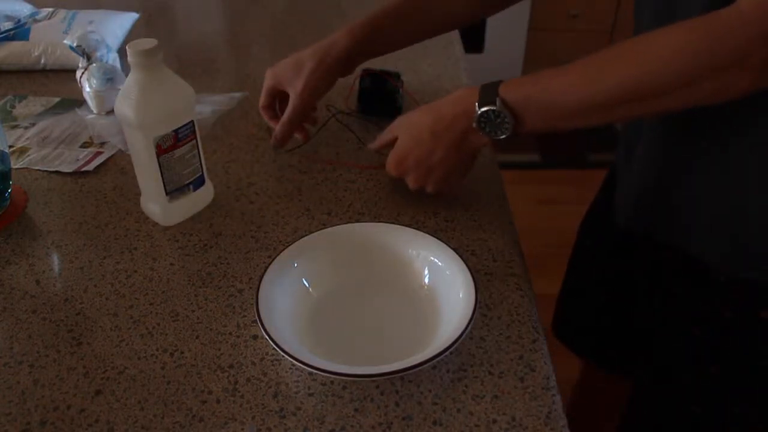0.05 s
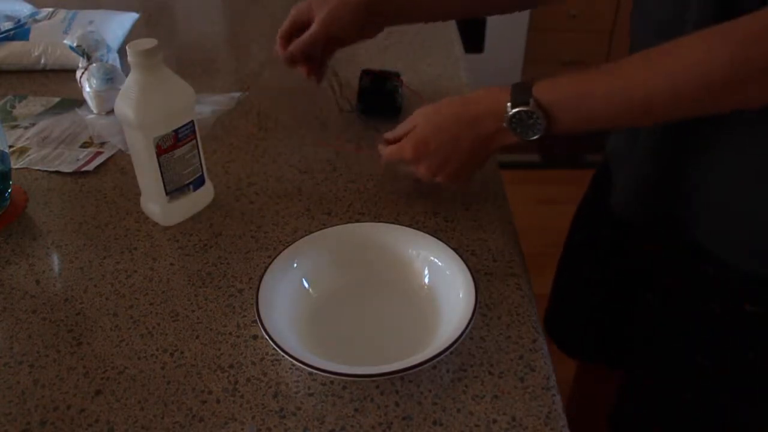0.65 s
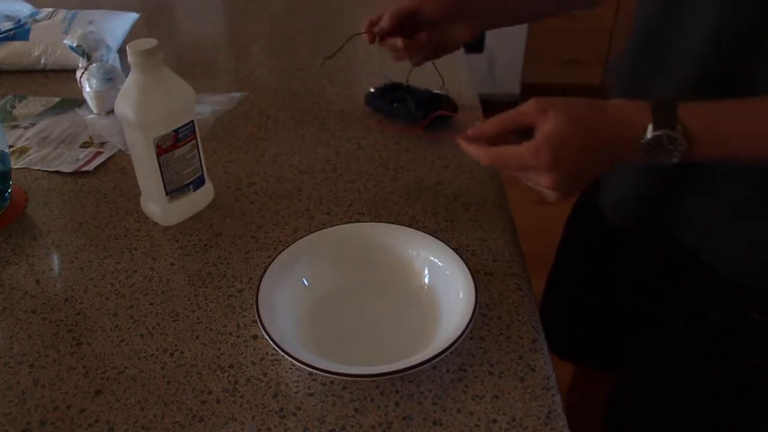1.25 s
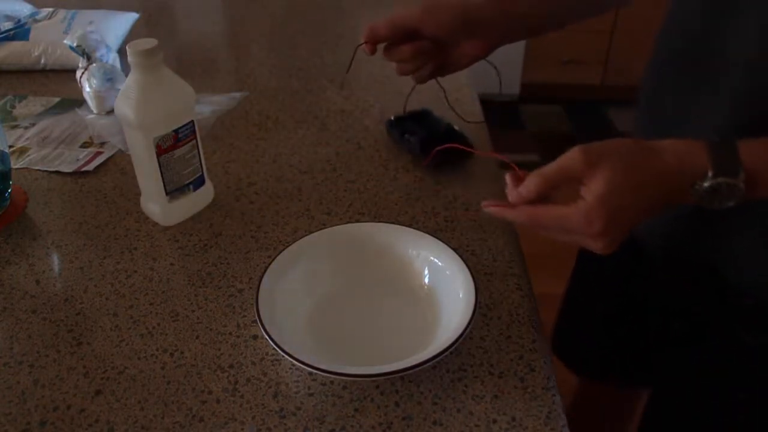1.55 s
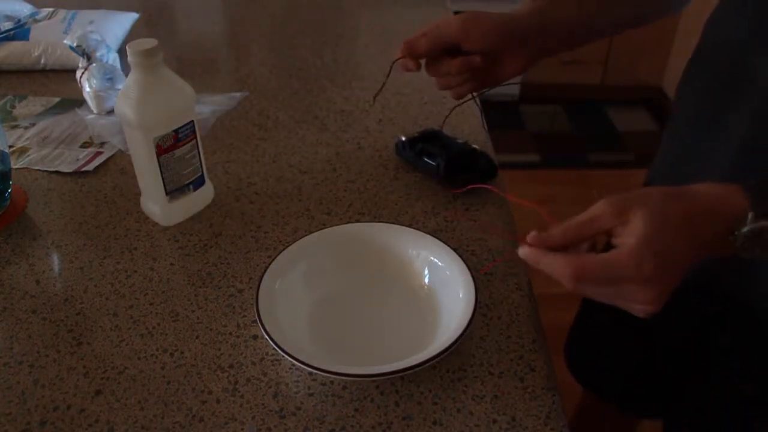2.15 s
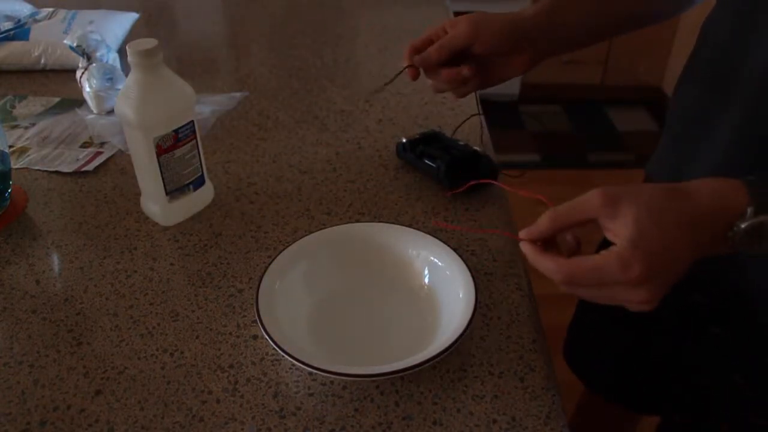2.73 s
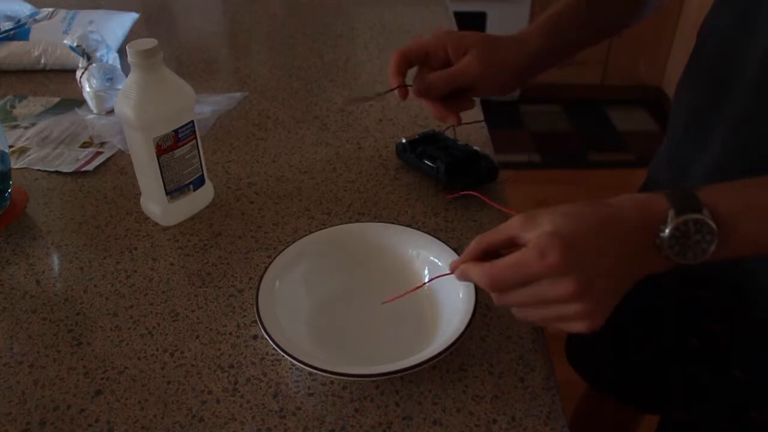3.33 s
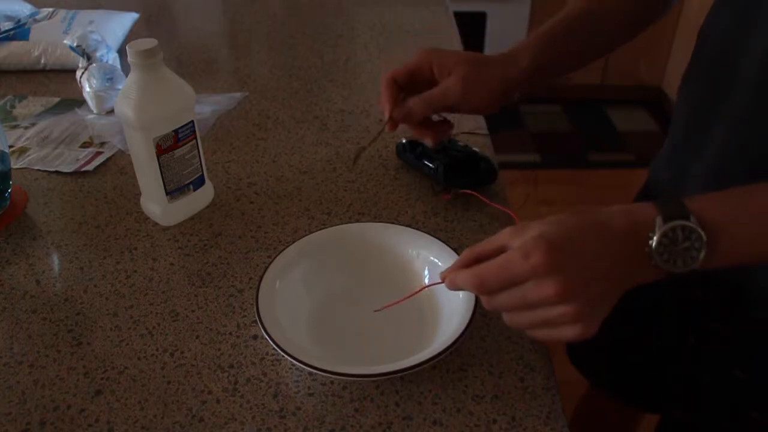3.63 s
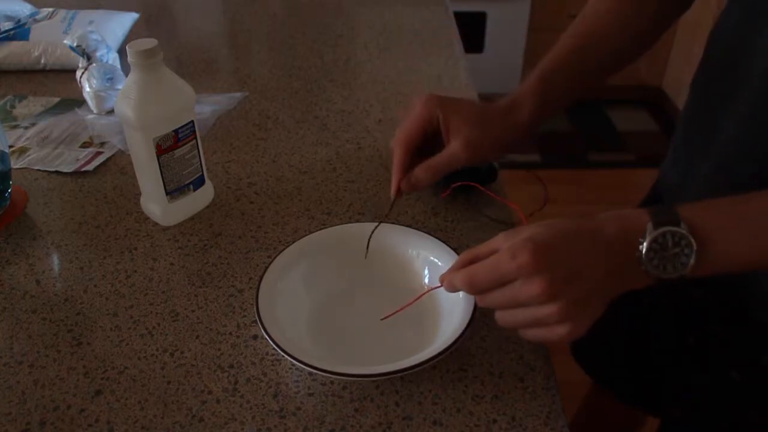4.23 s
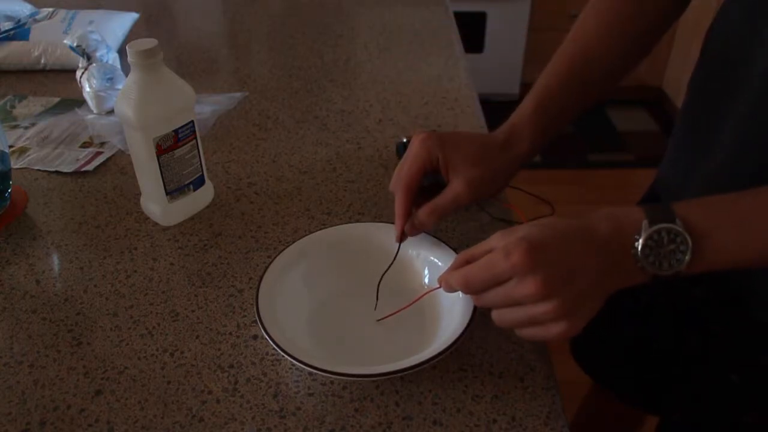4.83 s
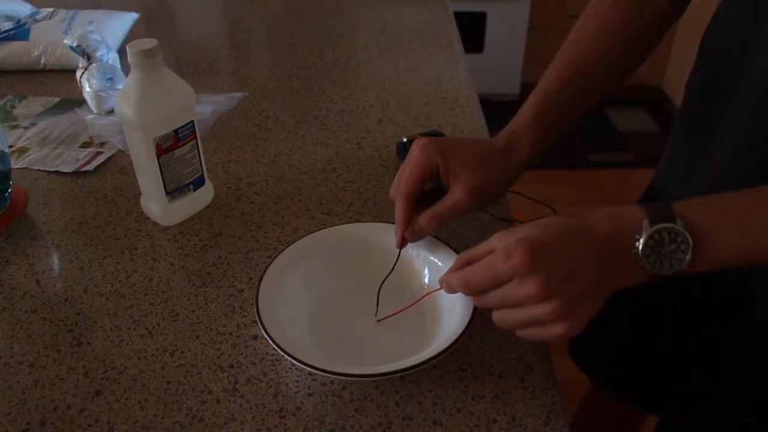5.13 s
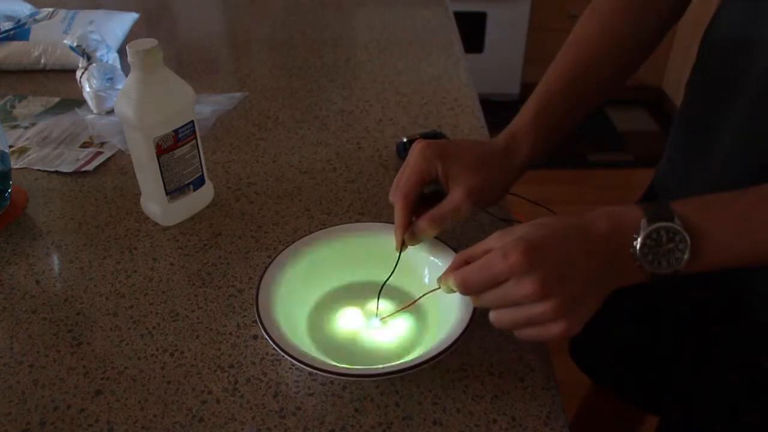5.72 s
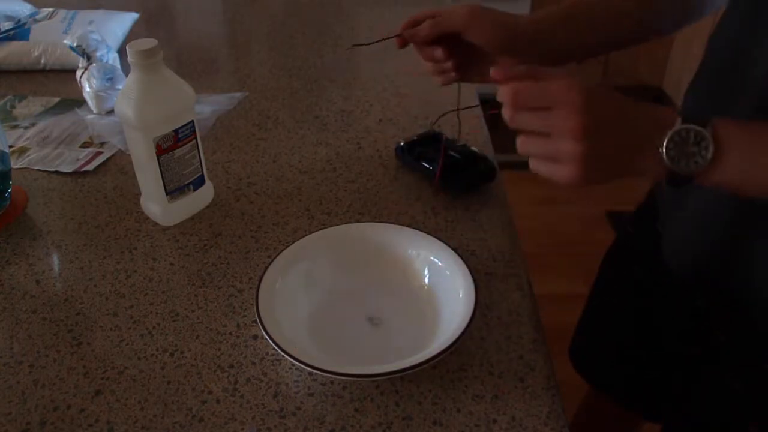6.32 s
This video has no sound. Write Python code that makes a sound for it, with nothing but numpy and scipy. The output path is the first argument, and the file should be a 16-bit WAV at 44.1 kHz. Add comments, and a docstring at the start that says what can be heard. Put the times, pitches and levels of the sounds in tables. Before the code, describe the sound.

In a quiet kitchen with faint air noise and an appliance hum, a small plastic device clicks and is dragged briefly over a stone counter, scraping and juddering. A few more light clicks follow. After a pause, alcohol vapour ignites in a bowl with one very loud, sharp crack that overloads the nearby microphone and rings around the room. Two soft knocks come as it fades.

```python
"""Faint air noise and an appliance hum in a kitchen. A small plastic spark unit clicks, is dragged by
its wires over the stone counter, and clicks again. The wires meet in a bowl of alcohol: one violent
crack, thrown back by counter, cupboards and walls, then two soft knocks of the unit. The crack clips
and ducks the gain, which recovers about as fast as the room dies away, so the tail hangs for a moment."""
import sys
import numpy as np
from scipy import signal
from scipy.fft import rfft, irfft, next_fast_len
from scipy.io import wavfile
from scipy.ndimage import uniform_filter1d

SR = 44100
rng = np.random.default_rng(int(sys.argv[2]) if len(sys.argv) > 2 else 0)


def to_wav(sig):
    """Store sig (one row per channel, or 1-D mono) as 16-bit WAV at the path in sys.argv[1].

    Samples outside -1..1 are clipped; the rate is SR.
    """
    pcm = np.clip(np.atleast_2d(sig), -1, 1) * 32767
    pcm = np.round(pcm).astype(np.int16)
    wavfile.write(sys.argv[1], SR, pcm.T)  # frames by channels


N = 280917
TIME_S = np.arange(N) / SR
FFT_SIZE = 2 * next_fast_len(N // 2 + SR // 2)
BIN_HZ = np.maximum(np.arange(FFT_SIZE // 2 + 1) * SR / FFT_SIZE, 1)
PAN = np.array([[0.5], [-0.5]])  # splits a left-over-right dB difference


def from_db(db):
    """Decibels to amplitude."""
    return 10 ** (np.asarray(db) / 20)


def unit_rms(x):
    """Scale to rms 1."""
    return x / np.sqrt(np.mean(x ** 2) + 1e-20)


def at_hz(table, hz):
    """Interpolate a table over log frequency."""
    known_hz, values = np.transpose(table)
    return np.interp(np.log(hz), np.log(known_hz), values)


def add(track, start_s, sound):
    """Mix a sound in at start_s."""
    start = round(start_s * SR)
    track[..., start:start + sound.shape[-1]] += sound[..., :N - start]


def colour(x, spectrum):
    """Minimum-phase filter, unit power gain."""
    cepstrum = irfft(np.log(unit_rms(from_db(at_hz(spectrum, BIN_HZ)))))
    cepstrum[1:FFT_SIZE // 2] *= 2
    cepstrum[FFT_SIZE // 2 + 1:] = 0
    return irfft(rfft(x, FFT_SIZE) * np.exp(rfft(cepstrum)))[..., :x.shape[-1]]


def resonate(x, modes):
    """Parallel two-pole resonators, output rms 1."""
    out = 0
    for pitch_hz, width_hz, gain_db in modes:
        radius = np.exp(-np.pi * width_hz / SR)
        feedback = [1, -2 * radius * np.cos(2 * np.pi * pitch_hz / SR), radius ** 2]
        out += from_db(gain_db) * (1 - radius ** 2) * signal.lfilter([1, 0, -1], feedback, x)
    return unit_rms(out)


def burst(t60_s):
    """Decaying noise, unit energy."""
    t = TIME_S[:SR // 4]
    noise = rng.standard_normal(len(t)) * from_db(-60 * t / t60_s)
    return noise / np.linalg.norm(noise)


def stereo_burst(t60_s, correlation):
    """A burst partly shared by left and right."""
    shared = np.sqrt(correlation) * burst(t60_s)
    return shared + np.sqrt(1 - correlation) * np.array([burst(t60_s), burst(t60_s)])


def stereo_noise(correlation_table, right_lag_s=0):
    """White noise with left-right correlation set by band."""
    correlation = at_hz(correlation_table, BIN_HZ)
    mid, side = rfft(rng.standard_normal((2, FFT_SIZE)))
    mid, side = mid * np.sqrt(1 + correlation), side * np.sqrt(1 - correlation)
    lag = np.exp(-2j * np.pi * BIN_HZ * right_lag_s)
    return unit_rms(irfft(np.array([mid + side, (mid - side) * lag]))[:, :N])


def reverberate(x, response):
    """Convolve a mono source with a stereo response."""
    return signal.fftconvolve(x[None], response, axes=1)[:, :N]


# air noise: freq_hz, density_db
AIR_SPECTRUM = [(15, -47), (25, -12), (53, -17.5), (122, -5), (260, -8), (389, -7.5), (421, -3),
                (469, -8.5), (826, -11), (1340, -15.5), (1950, -17.5), (3720, -20), (4040, -21),
                (4750, -22.5), (15500, -34.5)]
# air noise, left against right: freq_hz, correlation
AIR_CORRELATION = [(40, 0.86), (150, 0.29), (400, 0.42), (1200, 0.067), (3000, 0.29), (6000, 0.14),
                   (14000, 0.041)]
# appliance tones: pitch_hz, level_db
HUM_TONES = [(118.4, -71.5), (290.7, -70.5), (419, -65.5), (436, -65), (815, -71.5)]


def room_tone(hum_width_hz):
    """Steady air noise from the left and the wavering hum of an appliance."""
    air = colour(stereo_noise(AIR_CORRELATION, right_lag_s=0.00013), AIR_SPECTRUM)
    hum = sum(from_db(level_db) * resonate(rng.standard_normal(N), [(pitch_hz, hum_width_hz, 0)])
              for pitch_hz, level_db in HUM_TONES)
    return from_db(-52) * air + from_db(-2) * hum


# reverberation decay: freq_hz, t60_s
KITCHEN_DECAY = [(150, 0.75), (400, 0.61), (1000, 0.83), (2000, 0.66), (4000, 0.61), (7000, 0.51),
                 (10000, 0.39), (15000, 0.26)]
# reverberation, left against right: freq_hz, correlation
KITCHEN_CORRELATION = [(100, 1), (600, 0.93), (1300, 0.86), (2600, 0.7), (5000, 0.5), (8500, 0.115),
                       (13000, .04)]


def kitchen_tail(build_s):
    """Diffuse room response: it builds up, then each band dies at its own rate."""
    t = TIME_S[:SR]
    spectrum = rfft(stereo_noise(KITCHEN_CORRELATION)[:, :SR])
    log_hz = np.log(np.arange(spectrum.shape[1]) + 1)
    centres_hz = np.geomspace(100, 16000, 14)
    tail = 0
    for centre_hz, weights in zip(centres_hz, np.eye(len(centres_hz))):
        band = irfft(spectrum * np.interp(log_hz, np.log(centres_hz), weights), SR)
        tail += band * from_db(-60 * t / at_hz(KITCHEN_DECAY, centre_hz))
    tail *= 1 - np.exp(-t / build_s)
    return tail / np.linalg.norm(tail[0])


# bumps on the counter: start_s, thud_db, t60_s, tick_db
KNOCK_EVENTS = [(6.217, -45, 0.14, -51.5), (6.281, -35.5, 0.061, -20)]
# dull body and plastic contact: freq_hz, density_db
THUD_SPECTRUM = [(40, -25), (90, -10), (150, 0), (220, -6), (400, -17), (900, -22), (3000, -47)]
CLACK_SPECTRUM = [(300, -51), (1100, -21), (1500, 4), (2400, -1), (3100, 1), (4200, 2.5), (4700, -20),
                  (8000, -16.5), (10000, -44), (15000, -38)]


def knocks(tail, room_db):
    """The wires pull the unit back: dull bumps, each with a plastic tick."""
    thuds, ticks = np.zeros((2, N))
    for start_s, thud_db, t60_s, tick_db in KNOCK_EVENTS:
        add(thuds, start_s, rng.standard_normal(N) * from_db(thud_db - 60 * TIME_S / t60_s))
        add(ticks, start_s, from_db(tick_db) * burst(t60_s=0.012))
    dry = colour(thuds, THUD_SPECTRUM) + colour(ticks, CLACK_SPECTRUM)
    return dry + from_db(room_db) * reverberate(dry, tail)


def stick_slip(slips_per_s, catch_db, catches_per_s):
    """Dense impulses that swell and sink as the case catches and lets go."""
    knots = rng.standard_normal(2000)
    grip = from_db(catch_db * np.interp(TIME_S * catches_per_s, np.arange(len(knots)), knots))
    slipping = rng.random(N) < slips_per_s / SR
    return unit_rms(slipping * rng.standard_normal(N) * grip)


# resonances on the feet: pitch_hz, width_hz, gain_db
FOOT_MODES = [(139, 20, -13.5), (206, 9.3, 1.5)]
# bouts of judder: middle_s, length_s, level_db
JUDDER_BOUTS = [(1.013, .06, -55), (1.074, 0.11, -52), (1.187, 0.095, -51.5), (1.358, 0.054, -52.5),
                (1.502, 0.13, -55.5), (1.633, 0.18, -53), (1.804, 0.13, -52.5), (1.978, 0.13, -58)]


def foot_judder(friction):
    """The feet catch and shudder in short bouts."""
    feet = resonate(friction, FOOT_MODES)
    power = uniform_filter1d(feet ** 2, size=1024)
    levelled = unit_rms(feet / np.sqrt(power + 1e-9))
    envelope = 0
    for middle_s, length_s, level_db in JUDDER_BOUTS:
        position = np.clip((TIME_S - middle_s) / length_s, -0.5, 0.5)
        envelope += from_db(level_db) * np.cos(np.pi * position) ** 2
    return levelled * envelope


# speed of the pull: time_s, speed_db
PULL_SPEED = [(0.95, -29), (1.01, -13), (1.31, -10.5), (1.61, -1), (1.87, -11), (2.0, -29)]
# plastic case: pitch_hz, width_hz, gain_db
CASE_MODES = [(1400, 34, -10.5), (1730, 47, -14), (1918, 38, 1), (2382, 32, 0.5), (3116, 53, 0.5),
              (3590, 42, -10.5), (4000, 260, -14)]
# broad rub and fine grit: freq_hz, density_db
RUB_SPECTRUM = [(300, -16), (900, -4), (1400, -14), (2000, 6), (2700, 3), (3500, 2.5), (4500, -2.5),
                (5500, -13), (8000, -27)]
GRIT_SPECTRUM = [(3000, -0.5), (5700, 5), (6800, 1.5), (7500, 3), (8500, -3), (9500, 1), (11000, -8),
                 (15500, -19)]


def case_drag(tail, ease_db_per_s, dig_s, dig_width_s, room_db, judder_room_db):
    """Plastic dragged over stone rings, rubs and judders; the scrape swells once as an edge digs in."""
    pull_s, pull_db = np.transpose(PULL_SPEED)
    speed_db = np.interp(TIME_S, pull_s, pull_db, left=-200, right=-200)
    ease_db = ease_db_per_s * np.maximum(TIME_S - pull_s[0], 0)  # the wires take the weight
    dig_db = 12 * np.exp(-((TIME_S - dig_s) / dig_width_s) ** 2)
    friction = stick_slip(slips_per_s=5000, catch_db=1.6, catches_per_s=45)
    grains = stick_slip(slips_per_s=5000, catch_db=0.5, catches_per_s=31)
    ring = from_db(-51.5 + dig_db) * resonate(friction, CASE_MODES)
    rub = from_db(-53.5 + 0.83 * dig_db) * colour(friction, RUB_SPECTRUM)
    grit = from_db(-53.5 + speed_db) * colour(grains, GRIT_SPECTRUM)
    scrape = from_db(0.49 * speed_db - ease_db) * (ring + rub) + grit
    judder = foot_judder(friction)
    room_send = from_db(room_db) * scrape + from_db(judder_room_db) * judder
    return scrape + judder + reverberate(room_send, tail)


# contacts of the unit and its wires: start_s, level_db, snap_share, rattle_t60_s
CLICK_EVENTS = [(.8416, -30, 0.4, .03), (0.8816, -10.5, 0.97, 0.13), (3.062, -14, 0.11, 0.07),
                (3.596, -29.5, 0, 0.066), (3.746, -36, 0, .02), (4.017, -27.5, 0.7, 0.011)]
# hard contact: freq_hz, density_db
SNAP_SPECTRUM = [(300, -32), (1100, -12.5), (2400, -15.5), (3000, -4.5), (3550, 1.5), (4300, -7.5),
                 (5500, -12), (8500, -20), (10000, -11), (11500, -23), (15000, -39)]


def clicks(tail, rattle_db, bounce_s, bounce_db, scatter_db, room_db):
    """Sharp touches with brief rattles, bounced off the counter and scattered by the things on it."""
    hard, dull = np.zeros((2, N))
    for start_s, level_db, snap_share, rattle_t60_s in CLICK_EVENTS:
        touch = from_db(rattle_db) * burst(rattle_t60_s)
        touch[0] += 1
        touch *= from_db(level_db) / np.linalg.norm(touch)
        add(hard, start_s, touch * snap_share)
        add(dull, start_s, touch * (1 - snap_share))
    dry = colour(hard, SNAP_SPECTRUM) + colour(dull, CLACK_SPECTRUM)
    scatter = reverberate(dry, stereo_burst(t60_s=0.22, correlation=0.75))
    out = dry + from_db(scatter_db) * scatter + from_db(room_db) * reverberate(dry, tail)
    add(out, bounce_s, from_db(bounce_db) * dry)
    return out


# first reflections: delay_s, gain_db, pan_db
EARLY_ECHOES = [(.00055, -2, -4), (.0017, -13, -3), (.0058, -4.5, -1), (.0088, -2, -3.5), (0.0145, -4, 0),
                (0.033, 0.5, 1)]


def reflect(x):
    """Direct sound plus echoes from counter, cupboards and ceiling."""
    out = np.array([x, x])
    for delay_s, gain_db, pan_db in EARLY_ECHOES:
        add(out, delay_s, x * from_db(gain_db + pan_db * PAN))
    return out


# the shock heard directly, and as it fills the room: freq_hz, density_db
CRACK_SPECTRUM = [(40, -14.5), (200, -20), (500, -13.5), (1200, -5), (2500, -5.5), (3400, 3.5),
                  (5500, -2.5), (9200, -3.5), (11000, -16), (13500, -15), (15500, -15.5)]
ROAR_SPECTRUM = [(100, -44), (220, -28), (340, -20), (550, -13.5), (850, -11), (1200, -7.5), (1750, -5.5),
                 (2350, -7.5), (3300, -1.5), (5700, 0), (8800, -3.5), (11000, -6.5), (13400, -14.5),
                 (15800, -37)]
# bowl resonances: pitch_hz, width_hz, gain_db
BOWL_MODES = [(1026, 21, -8), (1300, 45, -8), (1410, 28, -9), (2720, 19, 6), (3100, 40, 7), (3350, 63, 4.5),
              (3870, 22, -1), (3880, 24, 5), (4400, 44, 3), (5260, 27, 1), (5180, 45, 1), (5970, 32, 9),
              (6800, 25, 11), (7440, 38, 9), (8600, 29, -4)]
# low ring set off by the bang: pitch_hz, level_db, t60_s
LOW_RING = [(349, -30, 0.88)]


def bang(tail, start_s, crack_db, roar_db, thump_db):
    """One pressure shock rattles round the bowl for a few milliseconds, then fills the room."""
    shock, scatter = np.zeros(N), np.zeros((2, N))
    add(shock, start_s, np.ones(1))
    add(scatter, start_s, from_db(3.5) * stereo_burst(t60_s=0.0062, correlation=0.87))
    crack = colour(reflect(shock) + scatter, CRACK_SPECTRUM)
    bowl = from_db(-14) * resonate(shock, BOWL_MODES) / np.sqrt(N)
    roar = reverberate(colour(shock, ROAR_SPECTRUM) + bowl, tail)
    out = from_db(crack_db) * crack + from_db(roar_db) * roar
    # low thump: the under-pressure that follows the shock, stronger on the left
    low_thump = -np.exp(-TIME_S[:SR // 10] / 0.001)
    add(out, start_s + 0.0018, from_db(thump_db + 10 * PAN) * low_thump)
    for pitch_hz, level_db, t60_s in LOW_RING:
        envelope = from_db(level_db - 60 * TIME_S / t60_s)
        add(out, start_s, envelope * np.sin(2 * np.pi * pitch_hz * TIME_S))
    return out


def scene():
    """All sources in one kitchen."""
    tail = kitchen_tail(build_s=0.0081)
    return (bang(tail, start_s=5.8049, crack_db=21.5, roar_db=31.5, thump_db=-18)
            + clicks(tail, rattle_db=1, bounce_s=0.0054, bounce_db=-13, scatter_db=-3.5, room_db=-9)
            + case_drag(tail, ease_db_per_s=6, dig_s=1.49, dig_width_s=0.05,
                        room_db=-3, judder_room_db=-9.5)
            + knocks(tail, room_db=-13)
            + room_tone(hum_width_hz=3.5))


def gain_control(x, threshold_db, attack_s, release_db_per_s):
    """Loud sound pulls the gain down fast; it climbs back at a steady rate."""
    power = uniform_filter1d(np.mean(x ** 2, axis=0), size=128, origin=63)
    excess_db = np.maximum(10 * np.log10(np.maximum(power, 1e-12)) - threshold_db, 0)
    ramp_db = release_db_per_s * TIME_S
    held_db = np.maximum.accumulate(excess_db + ramp_db) - ramp_db
    pole = np.exp(-1 / (attack_s * SR))
    duck_db = signal.lfilter([1 - pole], [1, -pole], held_db)
    return x * from_db(-duck_db)


def record(dry):
    """Gain control, clipping of the crack's first milliseconds, 16.5 kHz low-pass."""
    ducked = gain_control(dry, threshold_db=-20, attack_s=0.012, release_db_per_s=126.5)
    clipped = np.clip(ducked, -0.95, 0.95)
    return signal.sosfilt(signal.cheby2(16, 70, 16500, fs=SR, output="sos"), clipped)


dry = scene()
out = record(dry)
to_wav(out)
```